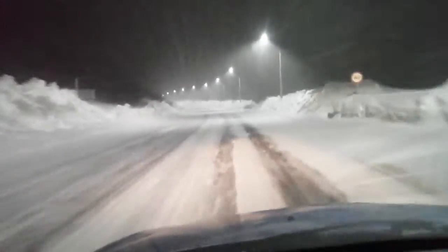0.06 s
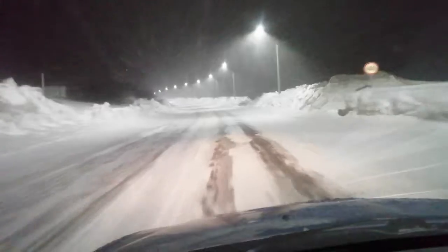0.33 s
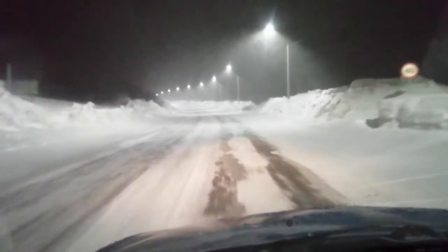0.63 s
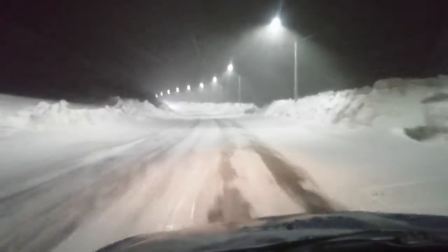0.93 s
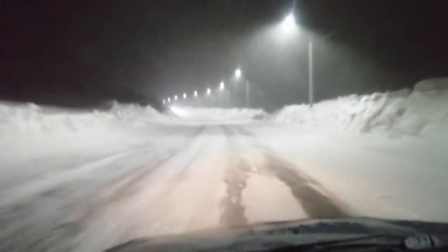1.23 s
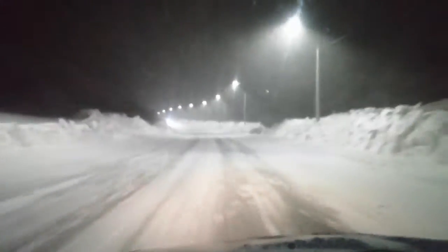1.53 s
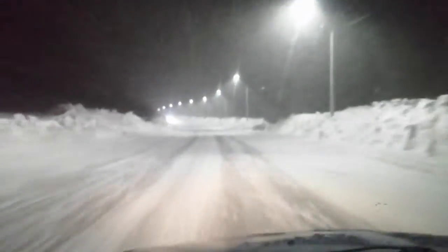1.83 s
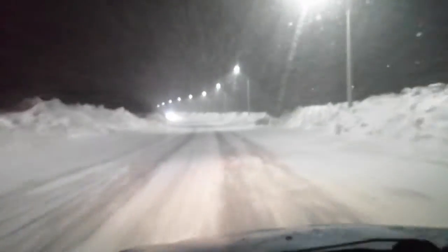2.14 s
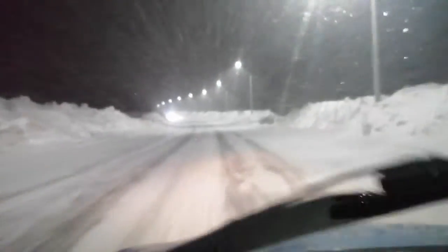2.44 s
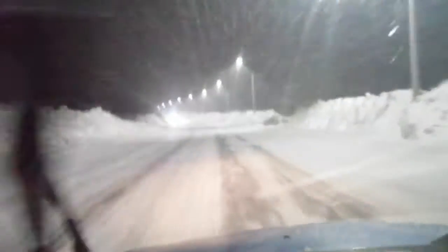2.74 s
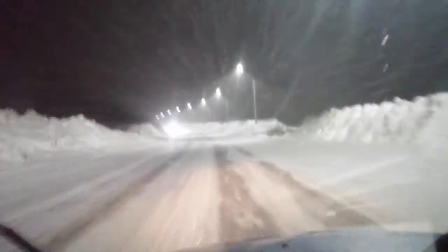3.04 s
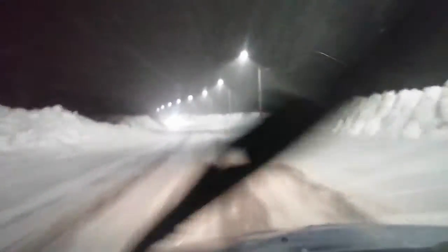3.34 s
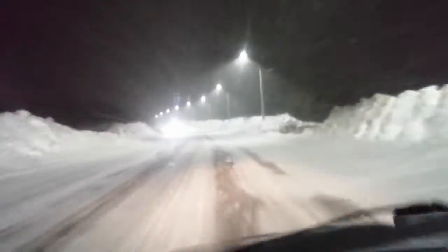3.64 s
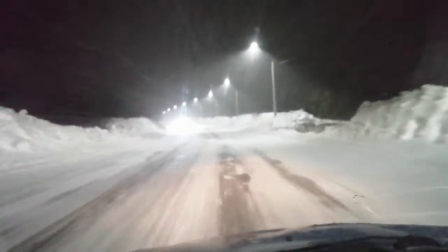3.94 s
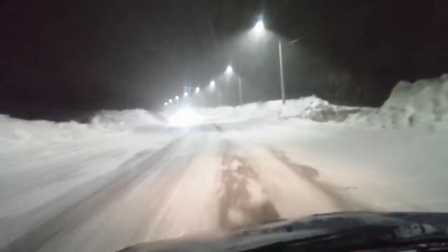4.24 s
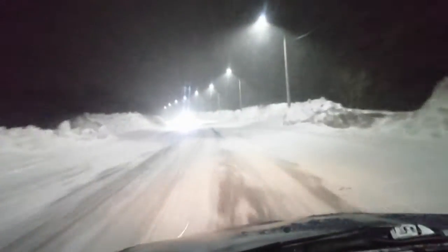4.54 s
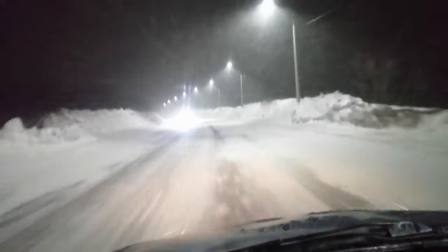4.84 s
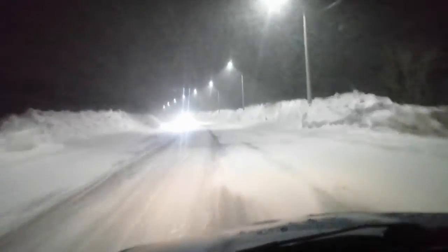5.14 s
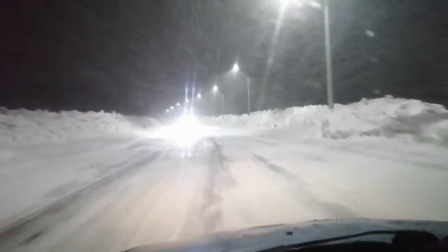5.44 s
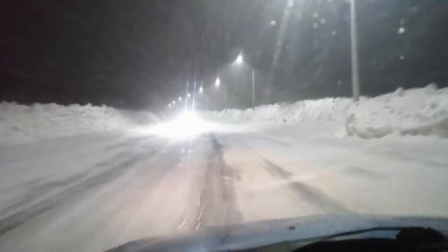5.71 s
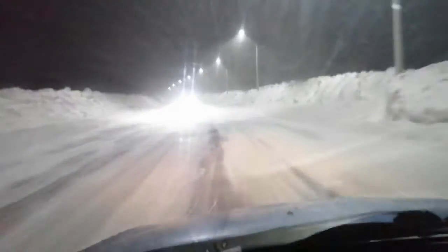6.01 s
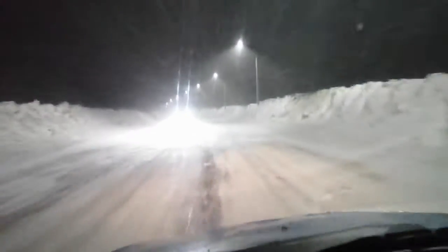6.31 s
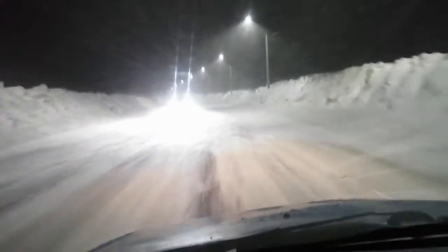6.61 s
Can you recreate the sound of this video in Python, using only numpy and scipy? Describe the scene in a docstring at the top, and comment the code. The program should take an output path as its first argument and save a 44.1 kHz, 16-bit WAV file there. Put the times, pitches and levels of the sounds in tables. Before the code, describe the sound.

Inside a car on a snowy road, tyres and engine rumble while the heater hisses and the wipers make one juddering sweep.

```python
"""Tyres on a snow-packed road, heard inside the car: the tread drones and roars, ruts make the body boom.
The engine shifts up once and sets panels booming, while the heater hisses from the vents.
The wipers make one sweep: a swish over wet glass, a stick-slip rubber judder, ticks on the way back.
Panels thud, and the plastic trim rustles, ticks and gives one thin squeak."""
import sys
import numpy as np
from scipy.fft import rfft, irfft, next_fast_len
from scipy.io import wavfile
from scipy.ndimage import uniform_filter1d, map_coordinates

SR = 44100
rng = np.random.default_rng(int(sys.argv[2]) if len(sys.argv) > 2 else 0)


def persist_wave(psi):
    """Save psi, clipped to +-1, as 16-bit WAV."""
    counts = np.round(np.clip(psi, -1, 1) * 32767).astype(np.int16)
    wavfile.write(sys.argv[1], SR, np.atleast_2d(counts).T)


N = 302967


def amp(db):
    """Decibels to gain."""
    return 10 ** (np.asarray(db) / 20)


def unit(x):
    """Scale to rms 1."""
    return x / np.sqrt(np.mean(x ** 2) + 1e-20)


def along(points, hz):
    """Read a curve of (f/Hz, value) points on a log frequency axis."""
    freqs, values = np.transpose(points)
    return np.interp(np.log(hz + 1), np.log(freqs + 1), values)


def boost(resonances, hz):
    """Decibels that (f/Hz, width/Hz, boost/dB) resonances add at a frequency."""
    return sum(db / (1 + (2 * (hz - centre) / width) ** 2) for centre, width, db in resonances)


def wobble(rate):
    """A smooth random curve, rate knots a second."""
    knots = rng.standard_normal(int(N * rate / SR) + 4)
    return map_coordinates(knots, [np.arange(N) * rate / SR])


def swell(peak_s, rise_s, hold_s, fall_s):
    """A gain that rises to 1, holds and falls; rise and fall times are for 20 dB."""
    t = np.arange(N) / SR - peak_s
    return amp(20 * np.minimum(np.minimum(t / rise_s, (hold_s - t) / fall_s), 0))


def surges(rows, rest_db, rise_s, fall_s):
    """Level in dB of a steady bed with (t/s, hold/s, level/dB) swells on top."""
    power = sum((amp(db) * swell(s, rise_s, hold, fall_s)) ** 2 for s, hold, db in rows)
    return 10 * np.log10(amp(rest_db) ** 2 + power)


def filtered(x, response):
    """Filter x by a complex response of frequency."""
    n = x.shape[-1]
    padded = next_fast_len(n + 8192)
    return irfft(rfft(x, padded) * response(np.fft.rfftfreq(padded, 1 / SR)), padded)[..., :n]


def steadied(x, span_s):
    """Even out the swells longer than span_s."""
    power = np.mean(np.atleast_2d(x) ** 2, axis=0)
    return x / np.sqrt(np.abs(uniform_filter1d(power, int(span_s * SR))) + 1e-9)


def cabin_noise(spectrum):
    """Noise of rms 1 in the cabin's resonances: alike at both ears in the bass, diffuse in the treble."""
    # air and panel resonances: f/Hz, width/Hz, boost/dB
    resonances = [(307, 47, 1.5), (410.6, 21, 4), (606, 18, 3.5), (719, 36, 3), (947, 35, 6), (1327, 36, 7),
                  (1800, 340, 1), (2278, 35, 5.5), (2582, 104, 5), (2710, 40, 2), (3290, 340, 4.5)]
    # likeness between the ears: f/Hz, correlation
    likeness = [(60, 0.94), (290, 0.95), (640, 0.92), (1000, 0.86), (1410, 0.26), (2500, 0), (15000, 0.023)]
    # stereo balance: f/Hz, left minus right/dB
    balance = [(30, 1.5), (90, -1.1), (190, 0), (270, 2), (450, 2.5), (1000, 1), (1500, -1), (2400, 4.5),
               (3600, 1), (6000, .5), (9000, 2.5), (13000, 0)]

    def mid_side(hz):
        angle = np.arccos(np.clip(along(likeness, hz), -1, 1)) / 2
        return amp(along(spectrum, hz) + boost(resonances, hz)) * [np.cos(angle), np.sin(angle)]

    mid, side = filtered(rng.standard_normal((2, N)), mid_side)
    ears = np.array([mid + side, mid - side])
    return unit(filtered(ears, lambda hz: amp(np.outer([.5, -.5], along(balance, hz)))))


def trim_noise(centre_hz, octaves, size):
    """A stereo band of noise, coloured by the dashboard plastic."""
    # tone of the plastic: f/Hz, level/dB
    plastic = [(500, -9), (1500, 9), (3100, 7), (4000, -10), (5300, 1), (7500, -5), (9700, -0.5),
               (12000, -10), (15000, -13)]
    band = lambda hz: np.exp(-.5 * (np.log2((hz + 1) / centre_hz) / octaves) ** 2)
    return unit(filtered(rng.standard_normal((2, size)), lambda hz: band(hz) * amp(along(plastic, hz))))


def road(smooth_db=-40, boom_gain_db=-0.55):
    """Ruts shake the body; the tread drones through the floor, more in ruts, and roars on packed snow."""
    # stretches of rutted snow: t/s, hold/s, level/dB
    ruts = [(1.69, 0.065, -33), (2.14, 0.2, -30.5), (2.55, 0.29, -32.5), (3.06, 0.044, -31),
            (3.33, 0.048, -30), (3.74, 0.039, -25.5), (3.93, 0.15, -31.5), (4.3, 0.096, -33),
            (4.62, 0.13, -35.5), (5.69, 0.046, -33.5), (6.0, .12, -36), (6.59, 0.19, -30.5)]
    # spectra of body boom, floor drone and tread roar: f/Hz, level/dB
    boom_spectrum = [(12, -38), (20, -6), (31, 1), (40, 0), (52, -6.5), (66, -9.5), (100, -40), (200, -91)]
    drone_spectrum = [(25, -15), (48, -7.5), (62, -3.5), (78, -4), (95, -3.5), (115, -4), (130, -5),
                      (155, -4.5), (168, -9.5), (210, -11.5), (300, -26.5), (600, -84)]
    roar_spectrum = [(100, -48), (200, -8.5), (280, 0), (340, -3), (410, -4), (500, -5), (660, -10),
                     (800, -8), (950, -10.5), (1200, -14), (1500, -30.5), (2100, -39), (4000, -55)]
    boom_db = surges(ruts, smooth_db, rise_s=0.067, fall_s=0.14)
    rough_db = boom_db - smooth_db
    boom = amp(boom_db + boom_gain_db) * steadied(cabin_noise(boom_spectrum), span_s=0.2)
    drone_db = -36.5 + 0.12 * rough_db + 0.47 * wobble(4.82)
    drone = amp(drone_db) * steadied(cabin_noise(drone_spectrum), span_s=0.29)
    roar_db = -41.5 + 0.0083 * rough_db + 0.67 * wobble(12)
    return boom + drone + amp(roar_db) * cabin_noise(roar_spectrum)


def firing_rate(shift_s=1.05, slide_s=.87, before_hz=62.53, after_hz=41.47, climb_hz_per_s=1.68):
    """The revs climb slowly in each gear and slide down during the upshift."""
    t = np.arange(N) / SR - shift_s
    shifted = np.clip(t / slide_s, 0, 1)
    return before_hz + (after_hz - before_hz) * shifted + climb_hz_per_s * (t - shifted * slide_s)


def engine(coast_db=-42.5, second_db=-45.5, third_db=-48, waver=0.0045, unsteady_db=0.8):
    """Load lifts the firing note and its overtones; each order swells as it crosses a panel resonance."""
    # pulls under load: t/s, hold/s, level/dB
    pulls = [(1.7, 0.047, -24.5), (1.97, .06, -30), (2.15, 0.17, -27.5), (2.46, 0.28, -31.5),
             (3.25, 0.73, -30.5), (6.62, 0.098, -31.5)]
    # booming panels: f/Hz, width/Hz, boost/dB
    panels = [(99.7, 2.8, 7.5), (107.7, 5.7, 14), (124.8, 1.1, 8)]
    hz = firing_rate()
    phase = 2 * np.pi * np.cumsum(hz * (1 + waver * wobble(5.12))) / SR
    firing_db = surges(pulls, coast_db, rise_s=0.15, fall_s=0.67)
    lift_db = 0.29 * (firing_db - coast_db)
    levels = [firing_db, second_db + lift_db, third_db + lift_db]
    return sum(amp(db + boost(panels, order * hz) + unsteady_db * wobble(6)) * np.sin(order * phase)
               for order, db in enumerate(levels, 1))


def heater(level_db=-52.5):
    """Air hisses steadily from the vents."""
    # vent hiss: f/Hz, level/dB
    hiss = [(700, -4), (1500, 3.5), (2000, -2.5), (2400, 0.5), (3200, -0.5), (3700, -9.5), (4300, -9),
            (5100, -2), (6200, -7.5), (7700, -10), (8800, -5.5), (10000, -7.5), (11200, -16),
            (13500, -21.5)]
    return amp(level_db + 0.34 * wobble(3.16) + 0.54 * wobble(25)) * cabin_noise(hiss)


def thuds(waver=0.0405, rise_s=0.017, fall_s=0.059):
    """A jolt sets one panel booming for a moment."""
    # jolts to the body panels: t/s, hold/s, level/dB, f/Hz
    jolts = [(.01, 0.024, -31.5, 188), (3.084, 0.037, -33.5, 185), (3.182, 0.011, -36.5, 290),
             (6.408, .06, -29, 99)]
    phase_per_hz = 2 * np.pi * np.cumsum(1 + waver * wobble(60)) / SR
    return sum(amp(db) * swell(s, rise_s, hold, fall_s) * np.sin(hz * phase_per_hz)
               for s, hold, db, hz in jolts)


def rustles(grain_db=1.5):
    """Something light brushes over the trim in short swells."""
    # soft brushes: t/s, half-length/s, level/dB, f/Hz
    brushes = [(.155, 0.16, -61, 10500), (0.31, 0.1, -61, 9500), (1.265, 0.15, -59, 5900),
               (5.9, .27, -63.5, 9800)]
    out, t = np.zeros((2, N)), np.arange(N) / SR
    for s, half_length, db, centre_hz in brushes:
        envelope = np.exp(-2 * ((t - s) / half_length) ** 2)
        out += amp(db) * envelope * trim_noise(centre_hz, octaves=0.58, size=N)
    return out * amp(grain_db * wobble(120))


def ticks(snap=.5, snap_s=0.0013, attack_s=0.00076):
    """Wiper joints and loose trim tick: a snap, then a tail that the small cabin damps fast; the blade also
    scrapes once."""
    # plastic ticks, and one short blade scrape at 2.363 s: t/s, level/dB, f/Hz, width/octaves, t60/s
    hits = [(1.099, -48, 6200, 0.44, 0.085), (1.099, -56, 4700, 0.094, .09), (2.2, -46, 9000, 1.2, 0.072),
            (2.211, -42, 3500, 1, .025), (2.363, -44.5, 2710, 0.4, 0.19), (3.006, -52, 5460, .4, 0.098),
            (3.139, -37.5, 8000, 1.3, 0.025), (3.141, -38.5, 3200, 0.33, .04),
            (3.168, -55, 6800, 0.64, .08), (3.176, -46, 3800, .9, .04), (3.208, -56, 7500, .8, .04),
            (3.956, -47.5, 5500, 0.43, .03), (3.967, -39.5, 3900, 1.3, 0.049),
            (3.971, -48, 6000, 0.56, 0.054), (4.007, -48, 2200, .6, .06), (4.009, -53, 12000, 0.91, .08),
            (4.514, -50, 7000, .7, .04), (4.73, -45.5, 9000, 2.2, 0.06)]
    out, t = np.zeros((2, N + SR)), np.arange(SR // 4) / SR
    onset = (1 + snap * np.exp(-t / snap_s)) * (1 - np.exp(-t / attack_s))
    for s, db, centre_hz, octaves, t60 in hits:
        start = round(s * SR)
        envelope = amp(db - 60 * t / t60) * onset
        out[:, start:start + len(t)] += envelope * trim_noise(centre_hz, octaves, size=len(t))
    return out[:, :N] * amp([[1.3], [-1.3]])  # a little to the left


def squeak(hz=6470, level_db=-61, waver=0.0095):
    """Two bits of plastic rub and sing for a moment."""
    tone = np.sin(2 * np.pi * np.cumsum(hz * (1 + waver * wobble(150))) / SR)
    return amp(level_db) * swell(peak_s=1.27, rise_s=.07, hold_s=0.055, fall_s=.025) * tone


def wiper_swish(grain_db=2, fall_s=0.044):
    """The blades push a gritty film of melted snow and drag with a dull rub where the glass is drier."""
    # strokes over wet and over drier glass: t/s, rise/s, hold/s, level/dB
    wet_strokes = [(2.275, .05, .008, -56), (2.326, .06, 0.016, -46.5), (2.356, 0.034, 0.011, -45.5),
                   (2.42, .1, .08, -63), (3.172, .08, .004, -48), (3.92, .08, 0.097, -57),
                   (4.3, 0.14, .002, -60)]
    dry_strokes = [(2.24, 0.055, 0.018, -41.5), (2.31, .06, 0.05, -42), (2.425, .05, 0.023, -42.5),
                   (3.17, .1, .005, -47)]
    # spectra of the wet swish and the dull rub: f/Hz, level/dB
    wet_spectrum = [(500, -18), (1200, 10.5), (1600, -4.5), (2300, 2), (3000, 2), (3400, -1), (4400, -11),
                    (5200, 0.5), (6100, -8.5), (9000, -8.5), (12000, -22), (15000, -25)]
    rub_spectrum = [(150, -27), (400, 7.5), (900, -4), (1400, -15), (2200, -40)]
    envelope = lambda rows: sum(amp(db) * swell(s, rise, hold, fall_s) for s, rise, hold, db in rows)
    film = envelope(wet_strokes) * amp(grain_db * wobble(250)) * cabin_noise(wet_spectrum)
    return film + envelope(dry_strokes) * cabin_noise(rub_spectrum)


def wiper_judder(jitter_cycles=0.076, scatter_db=1.5, roughness=0.31, grit_db=-22, shudder_db=-11):
    """Rubber grabs and slips: each uneven slip knocks the windscreen and shakes the arm; grit scrapes."""
    # modes of the windscreen and wiper arm: f/Hz, width/Hz, level/dB
    modes = [(183, 36, -6), (222, 28, 0), (259, 28, 2), (320, 46, -7), (404, 35, -11), (525, 44, -17.5),
             (606, 82, -28), (900, 44, -33)]
    # the blade grabs the glass: t/s, rise/s, hold/s, level/dB, slip rate/Hz, pitch factor of the modes
    grabs = [(2.784, 0.023, 0.011, -32, 88, 0.99), (2.818, 0.029, 0.022, -26, 88, .85),
             (2.846, 0.014, 0.037, -21.5, 87, 1.015), (2.9, 0.011, 0.028, -23, 94, 1.076)]
    glass = lambda f: sum((-1) ** k * amp(db) * 1j * f * width / (hz * hz - f * f + 1j * f * width)
                          for k, (hz, width, db) in enumerate(modes))
    soft = lambda f: 1 / (1 + (f / 1000) ** 4)  # rubber gives no sharp edges
    grit = amp(grit_db) * cabin_noise([(300, -25), (600, 3), (1300, -8), (3000, -19.0), (6000, -59)])
    jitter = jitter_cycles * wobble(80)
    strength = amp(scatter_db * wobble(70))
    rasp = roughness * rng.standard_normal(N)
    pan_left = amp([[2.7], [-2.7]])
    out = np.zeros((2, N))
    for s, rise, hold, db, slip_hz, pitch in grabs:
        cycle = slip_hz * (np.arange(N) / SR - s) + jitter
        slips = strength * np.diff(np.floor(cycle), prepend=np.floor(cycle[0]))  # one impulse a cycle
        ring = filtered(unit(slips) + rasp, lambda f: glass(f / pitch) * soft(f))
        groan = steadied(ring, span_s=0.026) * pan_left
        shudder = amp(shudder_db) * np.sin(2 * np.pi * cycle)
        out += amp(db) * swell(s, rise, hold, fall_s=0.027) * (groan + grit + shudder)
    return out


def scene(left_lead_s=.00007):
    """All sources together; the low sounds reach the left side a little earlier."""
    low = road() + engine() + wiper_judder() + thuds()
    low = filtered(low, lambda hz: np.exp(1j * np.pi * left_lead_s * np.outer([1, -1], hz)))
    return low + heater() + wiper_swish() + ticks() + rustles() + squeak()


def record(dry, top_hz=15250):
    """A brick-wall low-pass takes off the highest treble."""
    return filtered(dry, lambda hz: hz < top_hz)


dry = scene()
out = record(dry)
persist_wave(out)
```